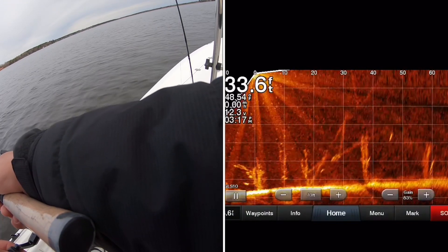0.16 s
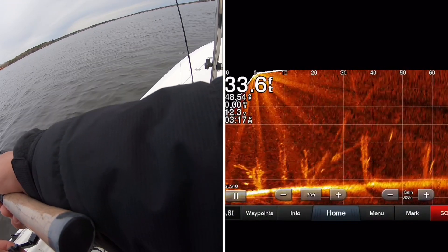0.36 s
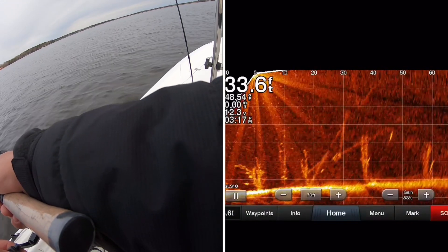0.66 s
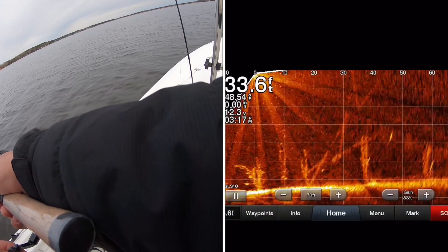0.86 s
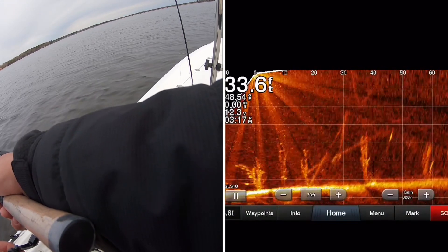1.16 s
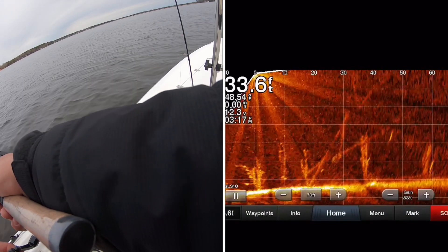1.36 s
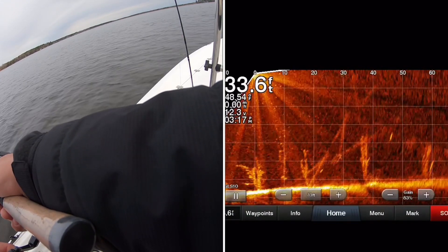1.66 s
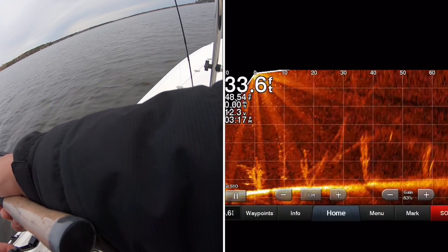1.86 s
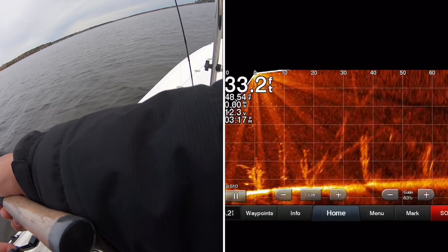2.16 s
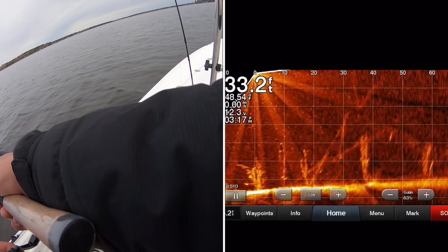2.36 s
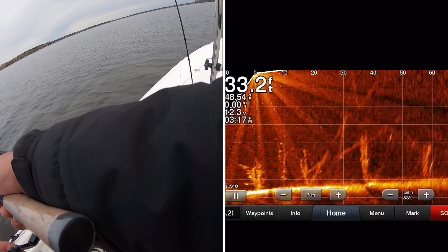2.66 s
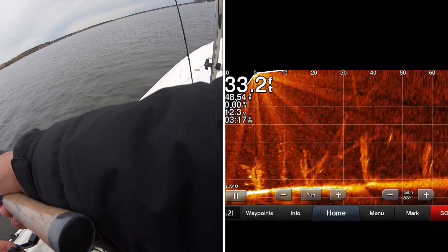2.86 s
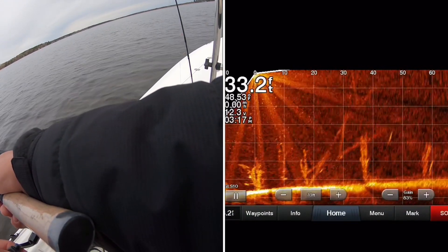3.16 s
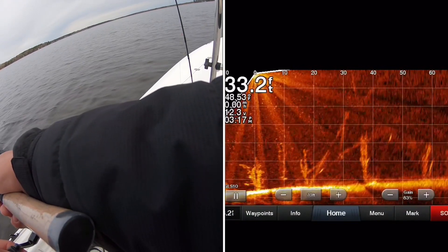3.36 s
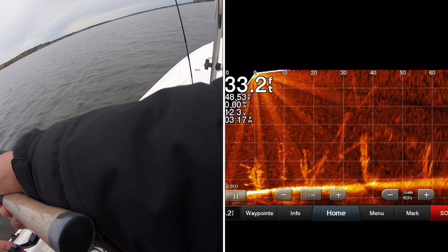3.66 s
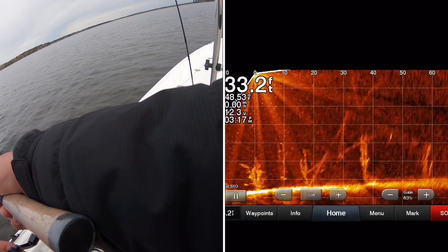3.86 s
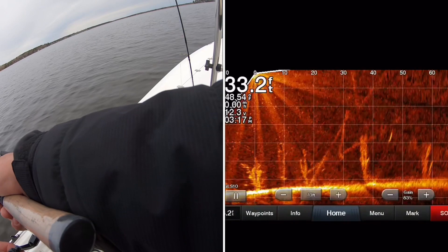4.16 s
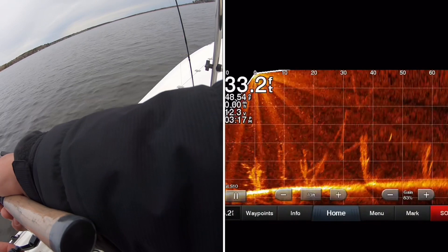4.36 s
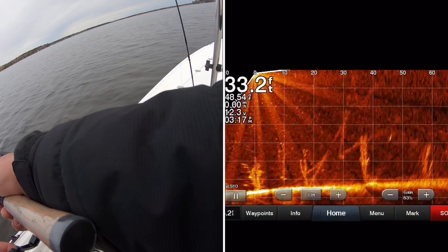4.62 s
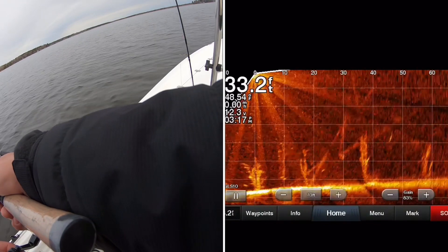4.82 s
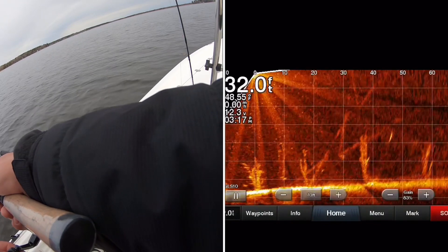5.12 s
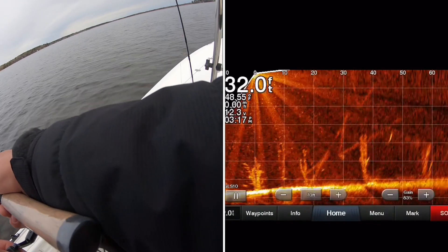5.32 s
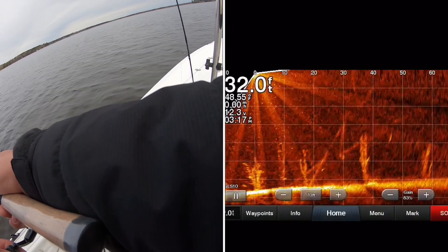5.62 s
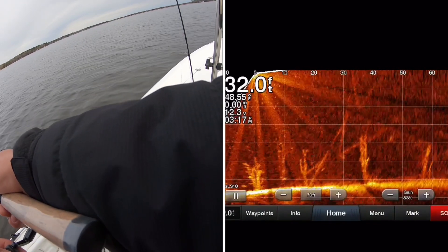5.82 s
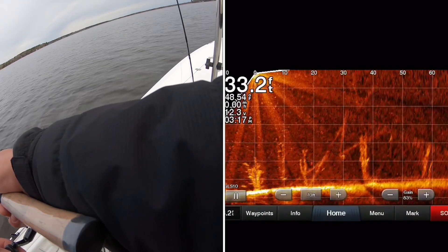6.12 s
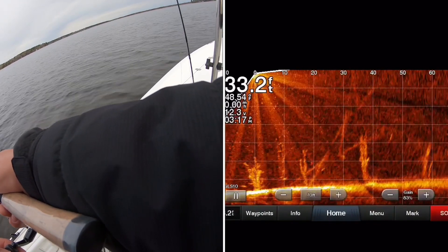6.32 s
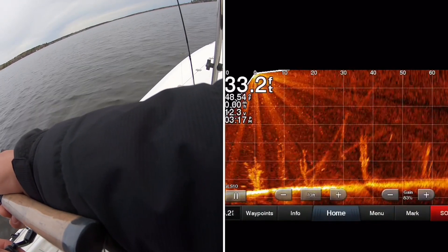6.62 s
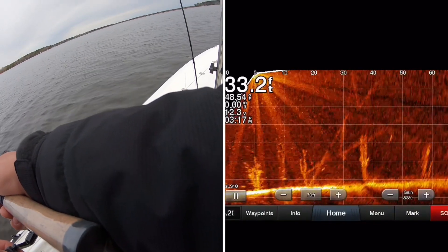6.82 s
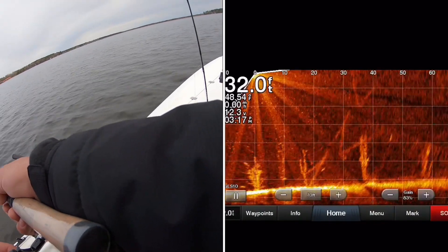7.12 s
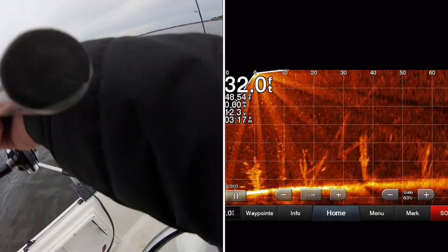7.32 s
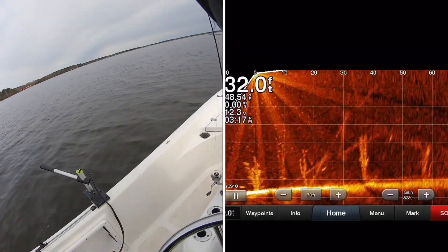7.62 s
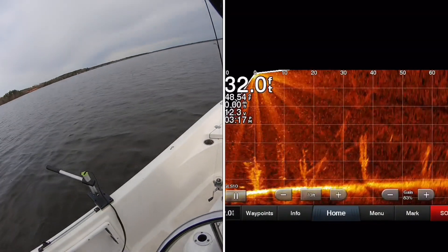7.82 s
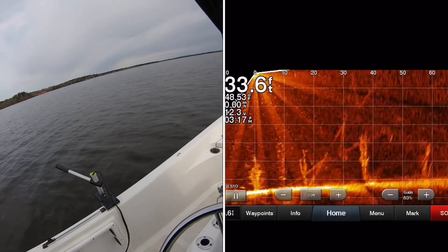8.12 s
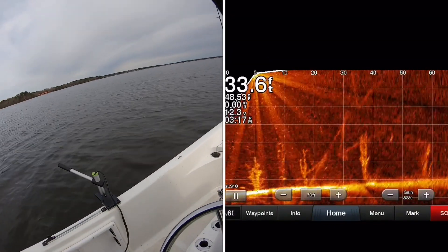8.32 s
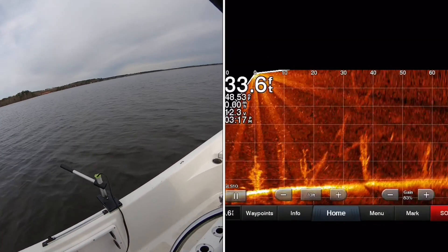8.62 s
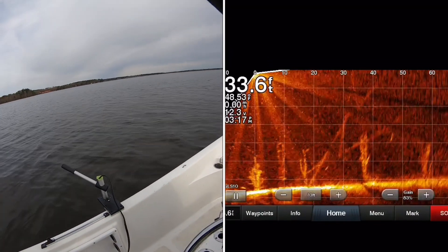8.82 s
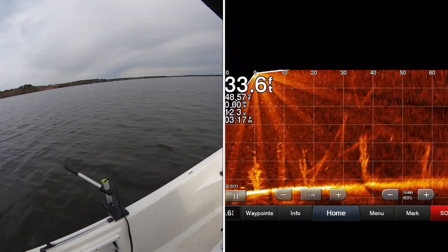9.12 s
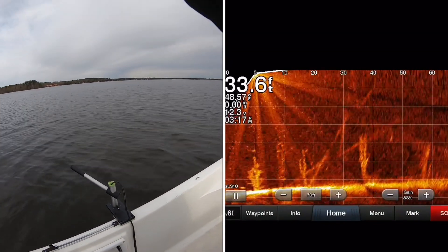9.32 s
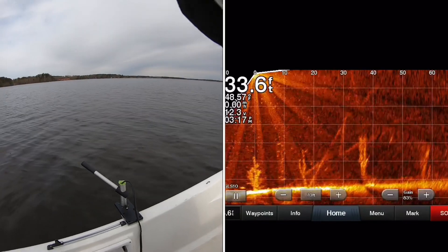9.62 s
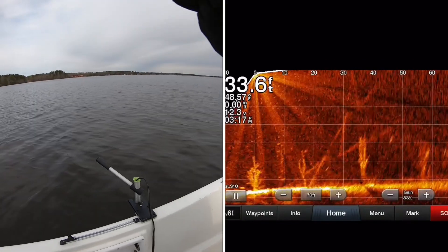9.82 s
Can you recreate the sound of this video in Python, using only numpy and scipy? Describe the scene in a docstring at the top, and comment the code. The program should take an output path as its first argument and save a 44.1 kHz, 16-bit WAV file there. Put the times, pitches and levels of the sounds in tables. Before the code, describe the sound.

Outdoors on a small drifting boat, heard close from a stereo microphone on the chest. From 0 to 7 s a low, hollow hull murmur lies under irregular wave slaps: a quick cluster around 0.3 s, then firmer knocks near 1.6, 2.1, 2.8, 3.4 and 5.1 s, each with a dull boom, trapped-air gulps, drips and fine spatter. A round plop sounds at 4.4 s; faint cloth brushing passes around 5.3 to 5.6 s. At 6.9 s water plops again, then a sleeve swishes abruptly past at 7.3 to 7.5 s with buffeting air. From 7.5 s the reel's drag ratchets in bright, uneven bursts with a thin metal ring, over continuous nylon rubbing. A hard wave smack lands at 8.15 s. Tackle clacks sharply twice around 9 s; clicks thin out and stop by 9.65 s, leaving rustling cloth and soft wind rumble from about 9.3 s.

```python
"""Drifting fishing boat, from the angler's chest

Small waves slap the hull close by: trapped air rings, panels knock, and drops, plops and spatter follow.
A two-port microphone on the chest hears a nylon sleeve brush, then swish past as the rod is swept up.
The reel's drag ratchets at an uneven speed, as filtered clicks with a ringing spool; tackle clacks twice.
The sleeve keeps rubbing, as shaped noise, while wind rumbles on the microphone near the end."""
import sys
import numpy as np
from scipy import signal
from scipy.fft import rfft, irfft, next_fast_len
from scipy.io import wavfile
from scipy.ndimage import uniform_filter1d

SR = 44100
rng = np.random.default_rng(int(sys.argv[2]) if len(sys.argv) > 2 else 0)


def store_pcm(level_fs):
    """Save levels as 16-bit WAV."""
    pcm = np.round(np.clip(level_fs, -1, 1) * 32767).astype(np.int16)
    wavfile.write(sys.argv[1], SR, np.atleast_2d(pcm).T)


N = 440115
TIME = np.arange(N) / SR

# waves on the hull, levels before trims:
# start_s, knock_db, boom_db, splash_db, trapped_air_hz, rise_s
SLAPS = [(.322, -34.5, -60.5, -57.5, 291, 0.0055), (.341, -21, -40.5, -59, 254, 0.0019),
         (.379, -29, -47.5, -72.5, 263, 0.0026), (.574, -30.5, -47, -57.5, 277.3, 0.016),
         (1.046, -46.5, -68, -62.5, 285, 0.0023), (1.619, -22, -34, -49.5, 232.3, 0.013),
         (1.757, -30.5, -54.5, -68, 245, 0.0037), (2.136, -25.5, -39, -54, 260, 0.0026),
         (2.421, -46.5, -75, -59.5, 189, 0.012), (2.528, -45, -67.5, -59, 400, 0.0042),
         (2.749, -46.5, -67, -62.5, 220.5, 0.0037), (2.81, -21.5, -36, -57, 261, 0.0087),
         (3.402, -31.5, -36, -56, 226, 0.027), (3.469, -33.5, -41.5, -65, 192, 0.01),
         (3.55, -46, -48, -69, 150, 0.014), (3.655, -45.5, -72, -67, 338.4, 0.0059),
         (4.26, -44.5, -44, -61.5, 241, 0.0045), (4.364, -33.5, -45, -56, 205, 0.0034),
         (4.404, -34, -56, -66, 205, 0.013), (4.535, -35.5, -51, -58, 263, 0.0074),
         (5.132, -22.5, -33, -51, 213, 0.0099), (5.211, -30, -47, -66, 186.5, 0.013),
         (5.298, -34.5, -62, -56.5, 172.5, 0.0078), (6.095, -38.5, -46.5, -52, 223, 0.014),
         (6.143, -32.5, -50, -50.5, 285, 0.011), (6.835, -28.5, -47.5, -58, 384, 0.016),
         (6.894, -36, -78, -46.5, 400, 0.0016), (7.335, -27, -69, -58, 268, 0.007),
         (7.638, -37.5, -54, -71, 255, 0.0043), (8.136, -17.5, -28, -40, 289.3, 0.0047),
         (8.966, -24, -30.5, -45, 296, 0.029), (9.232, -36, -46, -46.5, 277.8, 0.0033)]
# the sleeve whips past as the rod is swept up: time_s, level_db (before trim)
SWEEP = [(7.03, -96), (7.151, -67.5), (7.25, -51), (7.3, -45), (7.335, -30.5), (7.385, -25), (7.447, -23),
         (7.471, -30), (7.495, -45), (7.58, -78)]
# the sleeve while the rod is held up: time_s, rubbing_db (before trim), nylon_hiss_db
WINDING = [(7.52, -51, -45), (7.6, -56.5, -57), (7.655, -61, -55), (7.679, -53.5, -44), (7.8, -62.5, -46),
           (7.92, -49.5, -42), (8.0, -50.5, -47.5), (8.12, -46.5, -45), (8.33, -51, -47.5),
           (8.42, -45.5, -41.5), (8.499, -49, -43.5), (8.72, -56.5, -46), (8.8, -52, -48.5),
           (8.959, -47.5, -45), (9.19, -56, -52.5), (9.235, -46.5, -52), (9.365, -43, -48),
           (9.44, -47, -50.5), (9.55, -46.5, -47), (9.69, -50.5, -56), (9.78, -46, -53), (9.88, -47, -55),
           (9.98, -51.5, -59)]


def gain_of(db):
    """Decibels to amplitude."""
    return 10 ** (np.asarray(db) / 20)


def evened(x):
    """Scales to rms 1."""
    return x / np.sqrt(np.mean(x ** 2) + 1e-20)


def peaked(x):
    """Scales to peak 1."""
    return x / (abs(x).max() + 1e-20)


def burst(x):
    """Scales the loudest 20 ms to rms 1."""
    power = uniform_filter1d(np.mean(np.atleast_2d(x) ** 2, 0), size=882)
    return x / np.sqrt(power.max() + 1e-20)


def add(mix, s, sound):
    """Lays a sound into the stereo mix at time s."""
    part = mix[:, max(round(s * SR), 0):][:, :sound.shape[-1]]
    part += sound[..., :part.shape[1]]


def panned(x, side_db):
    """Makes the left channel side_db louder than the right."""
    return x * gain_of(np.array([[.5], [-.5]]) * side_db)


def noise(spectrum, same, size=N, lead_s=0, turn=0, rolloff_db_per_octave=30):
    """Stereo noise of rms 1 with left-right likeness same; the left port leads by lead_s plus turn radians."""
    hz, db = np.transpose(spectrum)
    same = np.clip(same, -1, 1)
    length = next_fast_len(size)
    a, b = rfft(rng.standard_normal((2, size)), length)
    f = np.fft.rfftfreq(length, 1 / SR)
    # the noise dies away above the top of its spectrum
    rolloff_db = rolloff_db_per_octave * np.log2(np.maximum(f / hz[-1], 1))
    colour = gain_of(np.interp(np.log(f + 1), np.log(hz), db) - rolloff_db)
    delayed = a * np.exp(-1j * (2 * np.pi * f * lead_s + turn))
    right = same * delayed + np.sqrt(1 - same ** 2) * b
    return evened(irfft(colour * [a, right], length)[:, :size])


def flutter(per_s, depth_db):
    """A gain that wanders at random, through per_s new levels a second."""
    knots = rng.standard_normal(N // 8)
    return gain_of(depth_db * np.interp(TIME * per_s, np.arange(len(knots)), knots))


def ring(modes, t, spread, scatter):
    """Dying modes, detuned and phased by where the blow lands; their phase differs at the two ports."""
    hz, db, t60 = np.transpose(modes)[:, :, None]
    tune, phase, port = 2 * rng.random((3, len(modes), 1)) - 1
    turn = 2 * np.pi * hz * (1 + spread * tune) * t + np.pi * phase
    fade = gain_of(db - 60 * t / t60)
    return np.array([(fade * np.sin(turn + side * scatter * port)).sum(0) for side in (-1, 1)])


def swell(t, rise):
    """A smooth onset, 63 % up after rise seconds."""
    return 1 - np.exp(-(np.maximum(t, 0) / rise) ** 2)


def curve_gain(s, db):
    """A level curve as a gain, silent outside its span."""
    return gain_of(np.interp(TIME, s, db, left=-np.inf, right=-np.inf))


def strokes(rows):
    """The gain of smooth swells, each rising and falling alike, down to 1/e at half_s from the peak."""
    return sum(gain_of(db) * np.exp(-((TIME - s) / half_s) ** 2) for s, db, half_s in rows)


def bubble(t, hz, glide, t60):
    """Air ringing under water, rising in pitch (by twice the glide per s) as it nears the surface."""
    t = np.maximum(t, 0)
    return np.sin(2 * np.pi * hz * t * (1 + glide * t)) * gain_of(-60 * t / t60)


def slop(rumble_db=-1, murmur_db=-58, stir_db=-4, hiss_db=-85, rock_db=-18, rock_lag_s=0.098, rock_s=0.13):
    """Ripples keep the hollow hull murmuring, over a faint even hiss; it rumbles as each wave rocks it."""
    # low rumble between waves: time_s, level_db (before trims)
    chop_curve = [(0, -53), (.85, -54), (1.4, -64), (6, -73.5), (8.75, -68)]
    # spectra of hull rumble, hull murmur and even hiss: frequency_hz, density_db per Hz
    rumble_spectrum = [(15, -5.5), (50, 3.5), (80, 10), (120, 0), (400, -75.5)]
    murmur_spectrum = [(70, -23), (120, -18.5), (143, 8), (175, -6), (215, 5), (250, -7), (290, -4.5),
                       (380, -13), (480, -18), (590, -31), (760, -24), (1100, -39), (3000, -52)]
    hiss_spectrum = [(20, 6), (700, -29), (1100, 9.5), (2000, 7), (4000, 6), (8500, 2), (10500, -6),
                     (16000, -21)]
    chop = gain_of(np.interp(TIME, *np.transpose(chop_curve)))
    # the hull rocks a moment after each slap, in step with its boom level
    rocking = strokes([(s + rock_lag_s, boom_db + rock_db, rock_s) for s, _, boom_db, *_ in SLAPS])
    rumble = evened(noise(rumble_spectrum, same=0.97) * flutter(per_s=16, depth_db=1.5))
    rumble = rumble * gain_of(rumble_db) * (chop + rocking)
    murmur = evened(noise(murmur_spectrum, same=0.64) * flutter(per_s=7.8, depth_db=0.5))
    murmur = murmur * np.hypot(gain_of(murmur_db), gain_of(stir_db) * chop)
    hiss = gain_of(hiss_db) * noise(hiss_spectrum, same=0.24)
    return panned(rumble + murmur, side_db=-1) + hiss


def spray(count=3, low_hz=1183, high_hz=3504, spray_db=-15, db_per_octave=-7, air_s=0.047):
    """Each splash throws a few drops, large to small, the small ones fainter: start_s, level_db, pitch_hz."""
    drops = []
    for s, _, _, splash_db, _, _ in SLAPS:
        for k, (delay, size) in enumerate(rng.random((count, 2))):
            octaves = np.log2(high_hz / low_hz) * (k + size) / count
            db = splash_db + spray_db + db_per_octave * octaves
            drops.append((s + air_s * delay, db, low_hz * 2 ** octaves))
    return drops


def plips(level_db=-1, ring_cycles=60, spread=.25, scatter_s=0.01, follow_db=-7, follow_t60=0.14,
          ripple_db=-9, ripple_t60=0.13, count=10):
    """A drop traps one bubble, then others that ring half as many cycles, and a soft tail of tiny ones."""
    # drops and bubbles that stand out: start_s, peak_db (before trim), pitch_hz
    single_drops = [(0.078, -60.5, 1500), (0.341, -52, 1380), (.814, -63.5, 2250), (1.05, -52.5, 660),
                    (2.14, -37.5, 645), (2.16, -36, 424), (2.519, -66.5, 1880), (2.614, -69, 2650),
                    (2.742, -58, 1410), (2.816, -59, 3430), (4.26, -59.5, 1400), (4.332, -65.5, 2390),
                    (4.491, -60, 2340), (4.619, -68, 3660), (5.712, -56.5, 1240), (6.115, -46.5, 1080),
                    (6.156, -58, 1920), (6.43, -65, 1250), (6.896, -41.5, 824), (6.908, -54, 2870),
                    (6.931, -57.5, 3030), (6.937, -48, 1190), (7.257, -35, 715), (8.158, -33, 1340)]
    # tiny bubbles stirred up by a drop: multiple of its pitch, density_db per Hz
    ripple_spectrum = [(.35, -35.5), (.75, -8.5), (1, 8.5), (1.35, -14.5), (2.4, -37)]
    out, t = np.zeros((2, N)), np.arange(SR // 8) / SR
    for s, db, hz in single_drops + spray():
        size, side = rng.standard_normal((2, count, 1))
        late = scatter_s * rng.exponential(1, (count, 1))
        pitch = hz * np.exp(spread * np.tanh(size / 2) * 2)
        others = bubble(t - late, pitch, glide=0.4, t60=ring_cycles / pitch / 2) * swell(t - late, 0.00045)
        others *= gain_of(follow_db - 60 * late / follow_t60)
        first = bubble(t, hz, glide=0.49, t60=ring_cycles / hz)
        ripple = noise(np.multiply(ripple_spectrum, (hz, 1)), same=0.49, size=len(t))
        ripple = ripple * gain_of(ripple_db - 60 * t / ripple_t60)
        ports = np.array([(others * (1 + k * side)).sum(0) for k in (-.5, .5)])
        ports = ports + (first + ripple) * swell(t, 0.001)
        add(out, s, gain_of(db + level_db) * peaked(ports))
    return out


def cracks(t60=0.0048):
    """A flat face of water smacks the side: a very short burst of noise."""
    # dry cracks where a wave lands flat: start_s, peak_db, lowest_strong_hz
    flat_landings = [(0.32, -51, 1110), (2.064, -60, 3500), (2.137, -43, 2650), (3.358, -52, 1140),
                     (6.157, -53, 1210), (8.159, -18.5, 1169)]
    # crack spectrum: multiple of that frequency, density_db per Hz
    crack_spectrum = [(.45, -19), (1, 5), (2.3, 11), (3.4, -41)]
    out, t = np.zeros((2, N)), np.arange(SR // 10) / SR
    for s, db, hz in flat_landings:
        snap = noise(np.multiply(crack_spectrum, (hz, 1)), same=0.33, size=len(t))
        add(out, s, gain_of(db) * peaked(snap * gain_of(-60 * t / t60) * swell(t, t60 / 10)))
    return out


def blows(delay_s=.056, pitch_ratio=0.72, softer_knock_db=-12.5, softer_boom_db=-5.5, softer_splash_db=-27):
    """Every slap, then the water falling back to knock again: softer, lower and nearly dry."""
    for s, knock_db, boom_db, splash_db, hz, rise in SLAPS:
        yield s, knock_db, boom_db, splash_db, hz, rise
        yield (s + delay_s, knock_db + softer_knock_db, boom_db + softer_boom_db,
               splash_db + softer_splash_db, hz * pitch_ratio, rise)


def slaps(panel_db=-1, pocket_db=-3, knock_trim_db=-7, gulp_db=-5, boom_rise_s=0.019, pocket_t60=0.19,
          gulp_t60=0.09, glide=0.37, splash_t60=0.36, pocket_rise=0.25, splash_rise=0.56,
          reach_db_per_octave=7, gulp_hz=463, gulp_lift_hz=3300):
    """Each wave traps a pocket of air that rings and shakes the panels; the whole hull booms a moment later."""
    # hull panels, then the hull flexing as a whole: frequency_hz, level_db, t60_s
    panel_modes = [(123, -3, 0.39), (146.3, 3.5, 0.32), (171.1, -3, 0.53), (206, -2, 0.46),
                   (250.7, -1, 0.27), (274.3, -0.5, 0.32), (322, 3.5, 0.15), (367.3, -1.5, 0.25),
                   (409, -12, 0.076)]
    flex_modes = [(34.6, -13, 0.21), (49.6, -4, 0.27), (68.3, 5.5, 0.18), (80.6, -3, 0.26),
                  (95.2, -0.5, 0.21), (108, -0.5, 0.27)]
    # water closing against the side: frequency_hz, density_db per Hz
    splash_spectrum = [(220, -12.5), (430, 10), (590, 4), (720, -0.5), (900, -3.5), (1080, -20),
                       (1600, -18), (2500, -31.5), (5000, -35.5), (9000, -56)]
    out, t = np.zeros((2, N)), np.arange(SR * 2 // 5) / SR
    for s, knock_db, boom_db, splash_db, hz, rise in blows():
        pocket = bubble(t, hz, glide, pocket_t60) * swell(t, rise * pocket_rise)
        # panels tuned near the pocket are driven hardest
        driven = [(f, level - reach_db_per_octave * abs(np.log2(f / hz)), t60)
                  for f, level, t60 in panel_modes]
        panels = ring(driven, t, spread=0.0575, scatter=0.12) * swell(t, rise)
        knock = burst(gain_of(pocket_db) * burst(pocket) + gain_of(panel_db) * burst(panels))
        boom = burst(ring(flex_modes, t, spread=0.07, scatter=0.17) * swell(t - rise, boom_rise_s))
        # a smaller cavity gulps inside the splash, higher after a harder slap
        water = noise(splash_spectrum, same=0.25, size=len(t)) * gain_of(-60 * t / splash_t60)
        cavity_hz = gulp_hz + gulp_lift_hz * gain_of(knock_db)
        gulp = gain_of(gulp_db) * burst(bubble(t, cavity_hz, glide, gulp_t60))
        splash = burst((burst(water) + gulp) * swell(t, rise * splash_rise))
        hull = gain_of(knock_db + knock_trim_db) * knock + gain_of(boom_db) * boom
        add(out, s, hull + gain_of(splash_db) * splash)
    return panned(out, side_db=-1.5)


def spatter(fall_s=.018, octaves=0.45, ring_cycles=14, uneven_db=4, t60=0.18, count=50):
    """Dozens of tiny droplets land in a thinning shower, each a brief tick."""
    # sheets of water that break into fine spatter: start_s, peak_db, middle_pitch_hz
    sheets = [(.322, -61.5, 2300), (.336, -44.5, 1000), (.587, -57, 1100), (1.622, -59, 1700),
              (3.361, -53.5, 1500), (3.394, -52, 2900), (4.369, -54, 1200), (4.535, -59, 900),
              (6.153, -57, 2020), (6.9, -50, 1500)]
    out, t = np.zeros((2, N)), np.arange(SR // 8) / SR
    for s, db, hz in sheets:
        size, force, side = rng.standard_normal((3, count, 1))
        late = fall_s * rng.exponential(1, (count, 1))
        pitch = hz * 2 ** (octaves * size)
        drops = bubble(t - late, pitch, glide=0, t60=ring_cycles / pitch)
        drops = drops * gain_of(uneven_db * force - 60 * late / t60)
        ports = np.array([(drops * (1 + k * side)).sum(0) for k in (-.5, .5)])
        add(out, s, gain_of(db) * peaked(ports))
    return out


def plops(settle_s=0.036, rise_s=0.0028, wobble=0.036, wobble_per_s=170, throb_db=3.5):
    """A cavity rings while the water reshapes it: its pitch bends, settles and wobbles."""
    # larger cavities that close with a round plop: start_s, level_db, pitch_hz, t60_s, bend_octaves
    cavities = [(.345, -58, 1420, 0.16, -0.063), (.589, -64, 1280, 0.12, .05),
                (2.14, -42.5, 784, 0.074, -0.25), (2.434, -56, 637, 0.21, -0.1),
                (2.528, -43.5, 421, 0.2, -0.34), (3.441, -42.5, 408, 0.14, -0.42),
                (4.38, -39, 450, 0.12, -0.51), (4.387, -56, 890, 0.087, .05),
                (4.404, -30, 204.8, .36, -0.19), (5.139, -52.5, 862, 0.12, -0.0028),
                (6.14, -61, 2510, 0.037, 0.95), (6.168, -49, 710, 0.099, -0.42),
                (6.897, -36, 699, 0.16, -0.049), (8.595, -31.5, 325, 0.11, -0.17)]
    out, t = np.zeros((2, N)), np.arange(SR // 4) / SR
    for s, db, hz, t60, bend in cavities:
        knots = rng.standard_normal((2, len(t) // 20))
        shape, loudness = (np.interp(t * wobble_per_s, np.arange(len(k)), k) for k in knots)
        pitch = hz * 2 ** (bend * (1 - np.exp(-t / settle_s))) * (1 + wobble * shape)
        fade = gain_of(throb_db * loudness - 60 * t / t60)
        tone = np.sin(2 * np.pi * np.cumsum(pitch) / SR) * fade * swell(t, rise_s)
        add(out, s, gain_of(db) * peaked(tone))
    return panned(out, side_db=-2.5)


def wake(lag_s=0.036, growth=0.48):
    """The gain of what trails the sweeping arm: later, and swelling fewer dB than the sweep."""
    s, db = np.transpose(SWEEP)
    return curve_gain(s + lag_s, growth * db)


def drifting(x, depth_db, bins=14, frames=10):
    """Shifting folds of cloth colour the rubbing in passing patches, some hundreds of Hz wide."""
    z = signal.stft(x, nperseg=1024, noverlap=768)[2]
    patches = uniform_filter1d(rng.standard_normal(z.shape[1:]), bins, axis=0)
    patches = uniform_filter1d(patches, frames, axis=1)
    return signal.istft(z * gain_of(depth_db * evened(patches)), nperseg=1024, noverlap=768)[1][:, :N]


def sleeve(rub_trim_db=3, wake_db=-24, swish_trim_db=-1.0):
    """Nylon threads catch and slip: a light touch hisses, a pressed one rubs lower, a fast sweep swishes."""
    # light strokes of the sleeve: peak_s, level_db, half_s (to 1/e)
    light_strokes = [(5.262, -61, 0.04), (5.36, -62, 0.05), (5.462, -62.5, 0.049), (5.532, -53, 0.014),
                     (5.582, -64, 0.04), (5.682, -71, 0.022), (6.872, -67.5, 0.019), (7.07, -61.5, 0.036)]
    # the arm passes mostly by the right port: time_s, left_minus_right_db (of the rubbing)
    arm_side = [(7.42, 6), (7.55, -4.5), (8.9, -4.5), (9.3, -4)]
    # spectra of pressed rubbing, nylon hiss, light strokes and swish: frequency_hz, density_db per Hz
    rub_spectrum = [(150, -29), (400, 0.5), (750, -0.5), (1400, 4), (1900, 5.5), (2400, 1.5), (2800, 2),
                    (3300, -1.5), (4200, -2.5), (7000, -7.5), (16000, -59)]
    nylon_spectrum = [(500, -5.5), (2000, 2.5), (3600, -3.5), (5700, 4.5), (6600, -1), (8000, -2),
                      (9300, -1.5), (10500, -10.5), (12500, -18.5), (15500, -32)]
    light_spectrum = [(400, -16), (1100, 4), (3000, 5), (4500, 3), (7000, 0.5), (9400, -3), (10800, -22),
                      (13000, -25), (15500, -49)]
    swish_spectrum = [(120, -14), (350, -0.5), (750, -6), (1000, -2), (1600, -0.5), (2300, -4), (3200, -9),
                      (4300, -16.5), (8000, -19.5), (15000, -42)]
    s, rub_db, nylon_db = np.transpose(WINDING)
    side_db = np.interp(TIME, *np.transpose(arm_side))
    rub = curve_gain(s, rub_db + rub_trim_db) * noise(rub_spectrum, same=0.26, lead_s=0.00028)
    rub = panned(rub, side_db)
    hiss_gain = curve_gain(s, nylon_db) + gain_of(wake_db) * wake()
    hiss = panned(hiss_gain * noise(nylon_spectrum, same=0.58, lead_s=0.000252), side_db * 0.21)
    brush = strokes(light_strokes) * noise(light_spectrum, same=0.35)
    swish_gain = gain_of(swish_trim_db) * curve_gain(*np.transpose(SWEEP))
    swish = panned(swish_gain * noise(swish_spectrum, same=0.75, turn=1.61), side_db=-9)
    catches = evened(flutter(per_s=700, depth_db=1.0) * flutter(per_s=58, depth_db=1.77))
    return catches * (drifting(rub + hiss, depth_db=2.0) + brush + swish)


def draught(wake_db=-26, rubbing_db=-8):
    """The moving arm drives lumps of air over the microphone."""
    # puffs of air on the microphone: peak_s, level_db, half_s (to 1/e)
    air_puffs = [(7.391, -29, 0.0022), (7.443, -25, 0.0059), (7.535, -52, 0.022), (7.9, -48, 0.13),
                 (9.65, -47.5, 0.049)]
    # air buffeting the ports: frequency_hz, density_db per Hz
    buffet_spectrum = [(15, -14), (50, 3), (130, 2), (220, -1), (380, -2.5), (700, -9), (2000, -65)]
    s, rub_db, _ = np.transpose(WINDING)
    lumps = evened(noise(buffet_spectrum, same=0.99) * flutter(per_s=120, depth_db=0.5))
    gain = gain_of(wake_db) * wake() + curve_gain(s, rub_db + rubbing_db) + strokes(air_puffs)
    return panned(lumps * gain, side_db=-4)


def teeth(count=32, stumble=.02):
    """Time and rate of every tooth: within each stretch the clicks quicken or slow evenly."""
    # clicking speed of the drag, in stretches: start_s, length_s, first_clicks_per_s, last_clicks_per_s
    stretches = [(7.504, 0.085, 121, 46), (7.6174, 0.064, 25.6, 45), (7.6867, 0.058, 95, 41),
                 (7.7648, 0.12, 67, 104), (7.8942, 0.14, 107, 52), (8.0422, 0.13, 85, 28.9),
                 (8.2025, 0.078, 44.6, 35), (8.2906, 0.096, 28, 102), (8.4, 0.079, 115, 45.4),
                 (8.4883, 0.064, 65, 104), (8.5588, 0.09, 90, 82), (8.6557, 0.073, 77, 130),
                 (8.7296, 0.061, 131.3, 41.5), (8.811, 0.077, 31.7, 20.7), (8.9127, 0.045, 60.9, 31),
                 (9.0753, 0.063, 21.8, 45.9), (9.161, 0.049, 55.5, 27), (9.3092, 0.064, 16.7, 16.7),
                 (9.4662, 0.058, 34, 76), (9.5346, 0.036, 72, 52.7), (9.589, 0.055, 23.4, 21.7)]
    for start, length, first_per_s, last_per_s in stretches:
        t = np.arange(0, length, 1 / SR)
        passed = np.cumsum(np.linspace(first_per_s, last_per_s, len(t))) / SR
        # stumble: unevenness as a share of the gap between teeth
        tooth = np.arange(count) + stumble * rng.standard_normal(count)
        at = np.interp(tooth[tooth < passed[-1]], passed, t)
        yield from zip(start + at, first_per_s + (last_per_s - first_per_s) * at / length)


def drag(tooth_db=-21.5, spool_db=-26, snap_s=0.00035, ring_uneven_db=7, uneven_db=1.5, skip_db_per_octave=.7):
    """The pawl snaps over each tooth as line is pulled out, and the metal spool rings on."""
    # snap of the pawl: frequency_hz, density_db per Hz
    pawl_spectrum = [(1000, -14), (2800, -11), (3800, 6), (5800, 5.5), (8100, 5.5), (9100, 4.5),
                     (10600, -8.5), (12500, -6.5), (15500, -17)]
    # ringing spool: frequency_hz, level_db (relative), t60_s
    spool_modes = [(7030, -1, 0.1), (7110, 2.5, 0.16), (7670, 6.5, 0.019), (5780, 2.5, 0.017)]
    out, t = np.zeros((2, N)), np.arange(SR // 8) / SR
    for s, per_s in teeth():
        tick = peaked(noise(pawl_spectrum, same=0, size=len(t)) * t ** 2 * np.exp(-t / snap_s))
        spool = ring(spool_modes, t, spread=0.0024, scatter=3.0) * swell(t, snap_s)
        ring_db = spool_db + ring_uneven_db * (2 * rng.random() - 1)
        spool = gain_of(ring_db) * panned(spool, side_db=10.5)
        # the faster the teeth pass, the less far the pawl falls
        db = tooth_db - skip_db_per_octave * np.log2(per_s) + uneven_db * rng.standard_normal()
        add(out, s, gain_of(db) * (tick + spool))
    return out


def weave():
    """Ribs of nylon slip over each other in a narrow, breathy band."""
    # the weave sings where the cloth slides steadily: peak_s, level_db, half_s (to 1/e), pitch_hz
    slides = [(7.961, -48.5, 0.25, 2410), (8.385, -64, 0.065, 5647), (8.67, -55, 0.085, 5706),
              (8.861, -50, 0.21, 2455), (9.311, -42.5, 0.075, 2373), (9.359, -44.5, 0.039, 4983),
              (9.47, -53, 0.064, 2370), (9.785, -50, 0.064, 4904), (9.892, -46.5, 0.11, 2410)]
    # breathy band: multiple of the pitch, density_db per Hz
    band_spectrum = [(.6, -45), (.9, -11.5), (1, 1.5), (1.1, -10), (1.6, -57)]
    out, t = np.zeros((2, N)), np.arange(-SR // 2, SR // 2) / SR
    for s, db, half_s, hz in slides:
        band = noise(np.multiply(band_spectrum, (hz, 1)), same=0.038, size=len(t))
        add(out, s + t[0], gain_of(db) * np.exp(-(t / half_s) ** 2) * band)
    return panned(out, side_db=1)


def breeze():
    """Wind rumbles on each port separately, very faint until it picks up."""
    # wind on the microphone: time_s, level_db
    wind_curve = [(8.95, -72), (9.35, -42.5)]
    # wind rumble: frequency_hz, density_db per Hz
    wind_spectrum = [(90, -2), (260, -16.5)]
    rumble = evened(noise(wind_spectrum, same=0) * flutter(per_s=33, depth_db=2.5))
    return panned(rumble * gain_of(np.interp(TIME, *np.transpose(wind_curve))), side_db=-3)


def clacks(rattle_db=-1, rattle_t60=0.1):
    """Hard tackle knocks together with a short rattle and a ring."""
    # tackle knocking: start_s, level_db, ring_tilt_db per octave about 5 kHz
    knocks = [(8.9764, -11, -2), (9.039, -17, 9.5)]
    # ringing tackle: frequency_hz, level_db (before tilt), t60_s
    tackle_modes = [(2450, -10, 0.095), (2660, -17, 0.091), (2720, -7, 0.14), (3230, -5.5, 0.11),
                    (3240, 3, 0.073), (3695, -11, 0.29), (3785, -14.5, 0.23), (3930, -8, 0.048),
                    (4490, -12.5, 0.21), (4870, -4, 0.055), (6900, -10, 0.15), (7170, -1, 0.038),
                    (7960, -8, 0.034), (8600, -8, 0.064), (8990, -9, 0.043)]
    # rattle: (frequency_hz, density_db per Hz)
    rattle_spectrum = [(600, -9), (3000, 12), (4600, -5), (5700, 2), (9000, 10.5), (10800, -12.0), (15000, -19)]
    out, t = np.zeros((2, N)), np.arange(SR // 3) / SR
    for s, db, tilt_db in knocks:
        modes = [(hz, level + tilt_db * np.log2(hz / 5000), t60) for hz, level, t60 in tackle_modes]
        rattle = noise(rattle_spectrum, same=0, size=len(t)) * gain_of(rattle_db - 60 * t / rattle_t60)
        sound = ring(modes, t, spread=0.0006, scatter=1.7) + rattle
        add(out, s, gain_of(db) * peaked(sound * swell(t, 0.0003)))
    return panned(out, side_db=-7.5)


def scene():
    """Water and boat, then the angler and the reel."""
    water = slop() + plips() + cracks() + slaps() + spatter() + plops()
    angler = sleeve() + draught() + weave()
    return water + angler + drag() + breeze() + clacks()


def record(dry, edge_hz=15900):
    """A steep low-pass: nothing sounds above about 16 kHz."""
    low_pass = signal.firwin(511, edge_hz, window=("kaiser", 9), fs=SR)
    return signal.oaconvolve(dry, low_pass[None], "same")


dry = scene()
out = record(dry)
store_pcm(out)
```